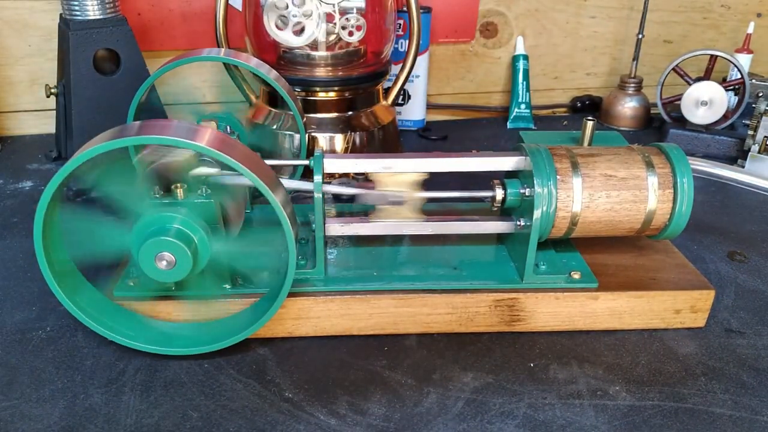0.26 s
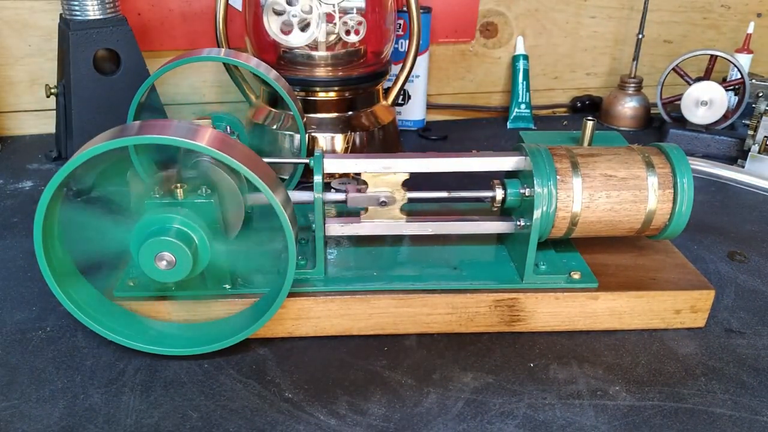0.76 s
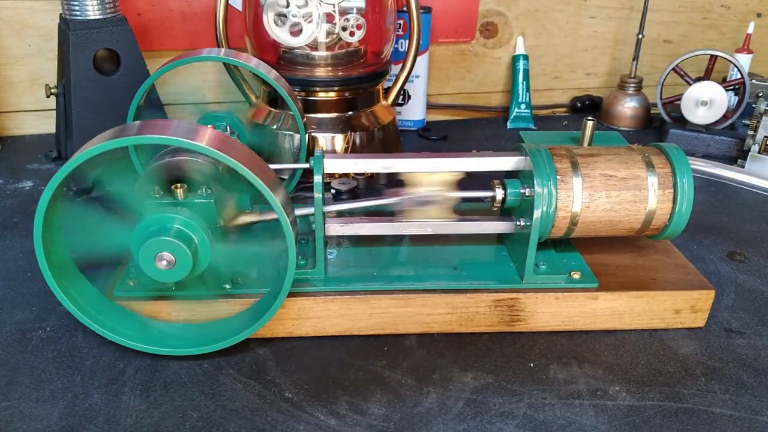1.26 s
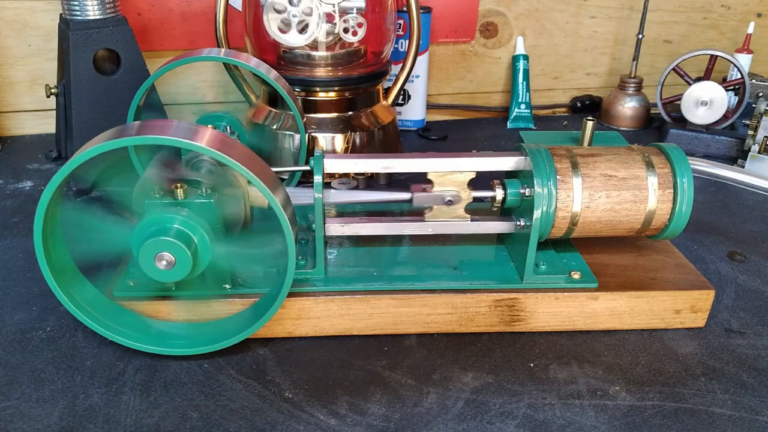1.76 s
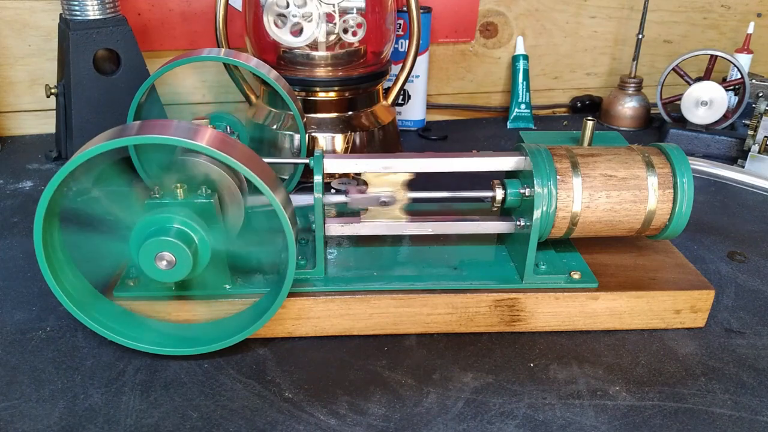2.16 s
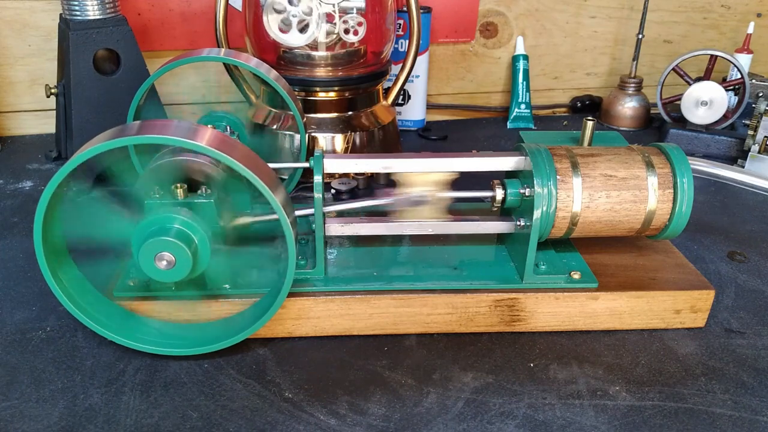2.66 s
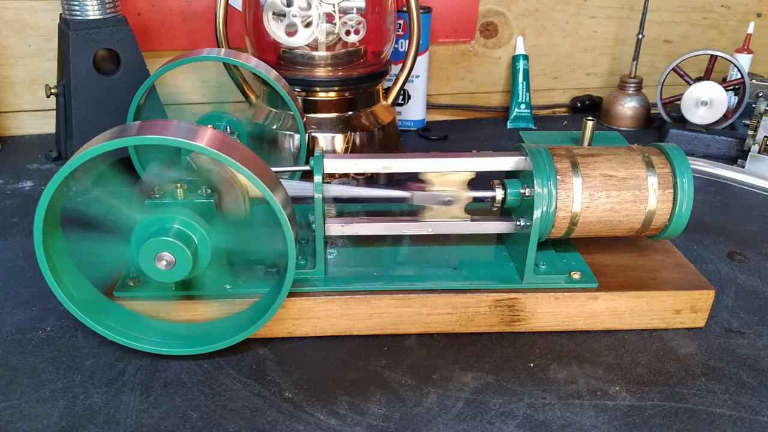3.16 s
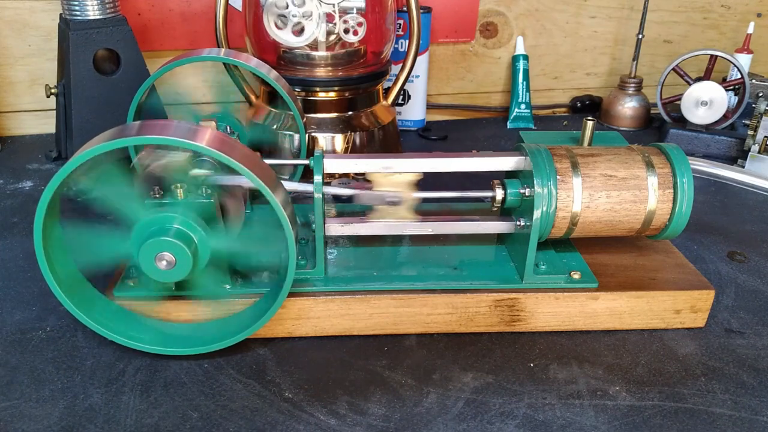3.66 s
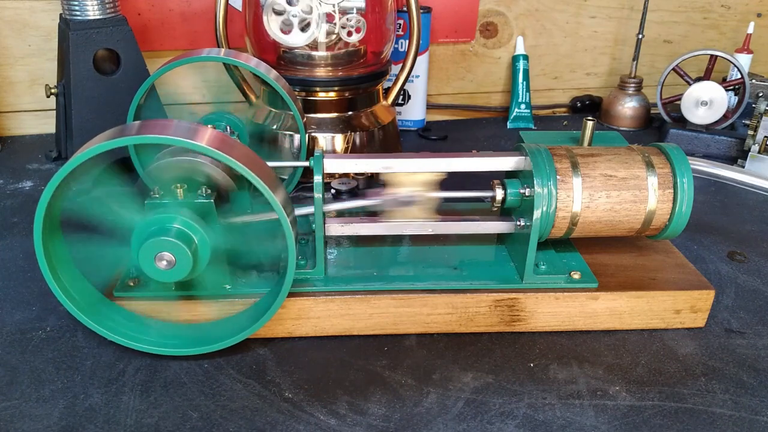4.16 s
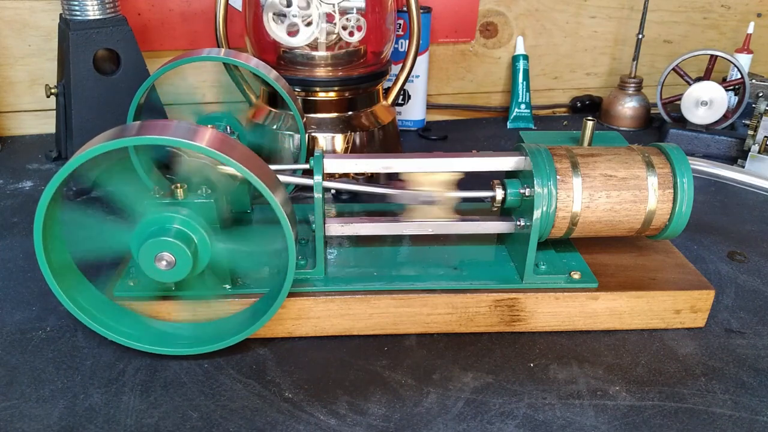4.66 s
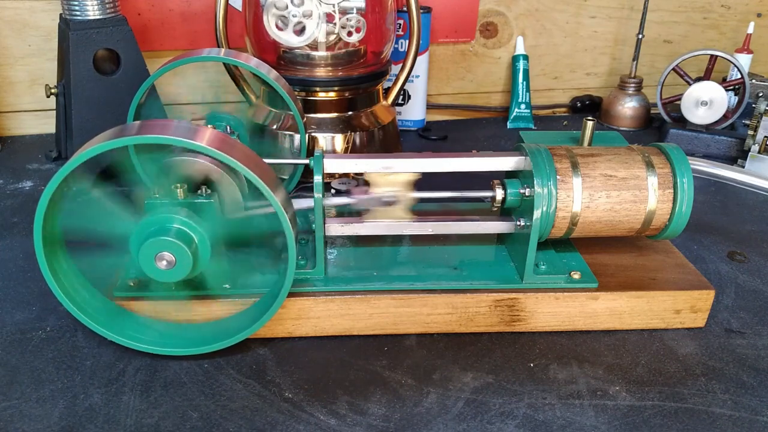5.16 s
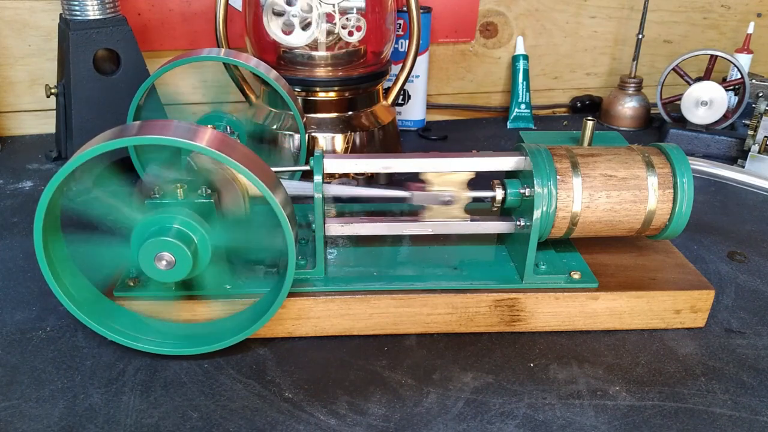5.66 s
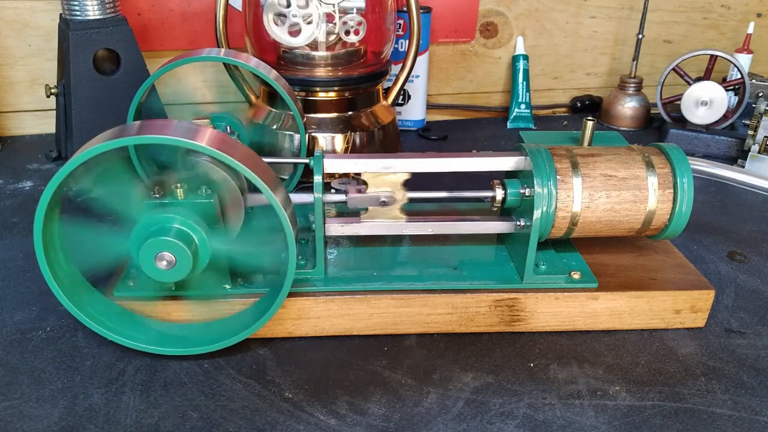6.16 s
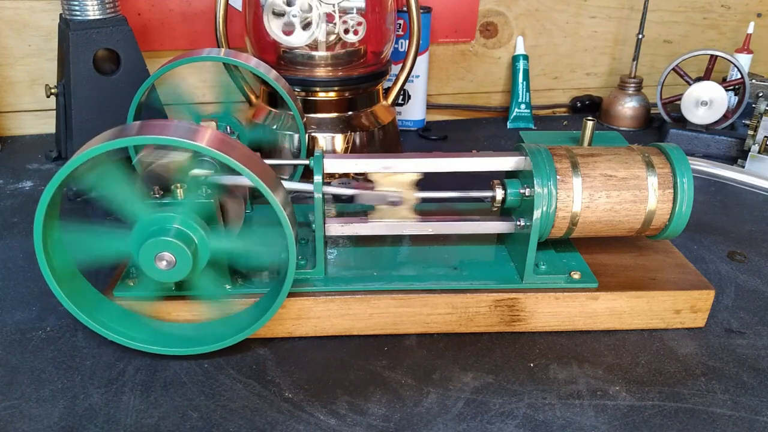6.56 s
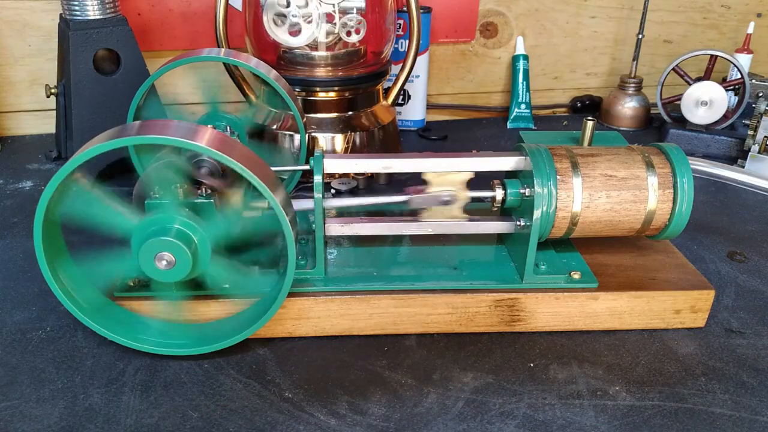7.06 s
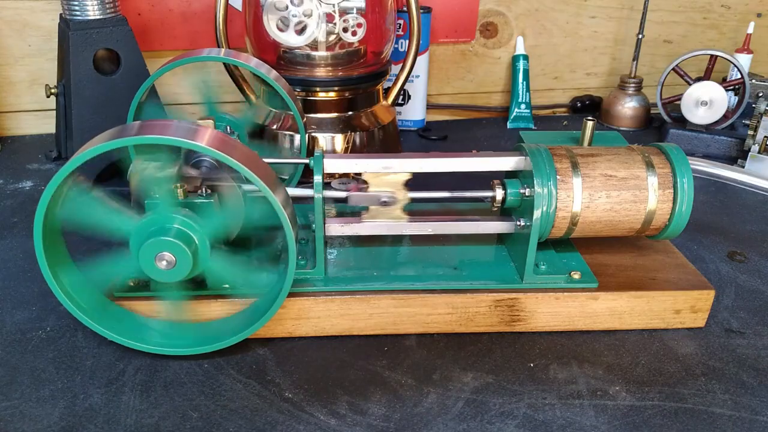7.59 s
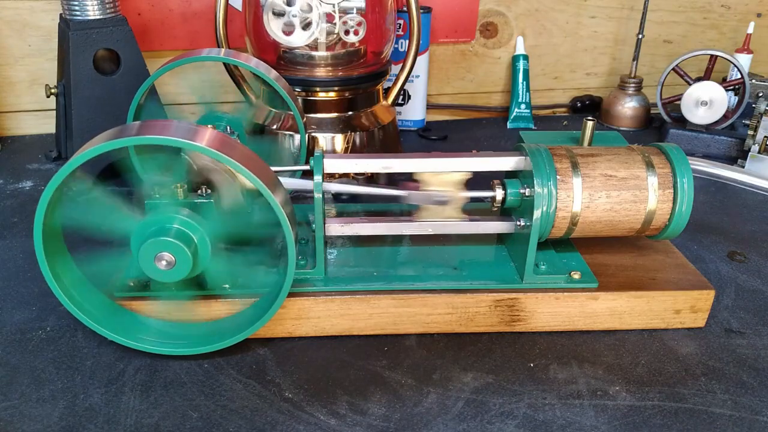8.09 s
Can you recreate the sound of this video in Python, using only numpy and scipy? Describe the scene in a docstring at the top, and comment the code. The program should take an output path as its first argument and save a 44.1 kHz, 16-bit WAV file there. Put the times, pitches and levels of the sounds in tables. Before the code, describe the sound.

A small model engine on compressed air puffs sharp, bright hisses in quick alternating strong and weak beats, gradually slowing, heard very close in a workshop.

```python
"""On a workshop bench a small double-acting model engine runs on compressed air and slowly loses speed.
Twice a turn the slide valve vents the cylinder: noise gated by the flow makes a sharp hiss, strong then weak.
Between the puffs the piston pushes the remaining air out as a softer hiss; strong puffs crest in low crackle.
Decaying sines ring the wooden base under the crank knocks, the bearing ticks, crosshead and valve rod rub.
A short echo and the quiet of the shop lie behind; the loudest puffs overload a phone held close."""
import sys
import numpy as np
from scipy import signal
from scipy.fft import rfft, irfft, next_fast_len
from scipy.io import wavfile
from scipy.ndimage import uniform_filter1d

SR = 44100
rng = np.random.default_rng(int(sys.argv[2]) if len(sys.argv) > 2 else 0)


def put_to_file(sound):
    """Save the sound as 16-bit audio at rate SR, in the file named by the first command-line argument."""
    columns = np.atleast_2d(sound).T  # one column per channel
    safe = np.clip(columns, -1, 1)
    whole_steps = np.round(safe * 32767)
    wavfile.write(sys.argv[1], SR, whole_steps.astype(np.int16))


N = 367353
T = np.arange(N) / SR  # time in s
SIZE = next_fast_len(N + SR // 2)  # transform length with room for decaying tails
HZ = np.maximum(np.arange(SIZE // 2 + 1) * SR / SIZE, 1)

# Exhaust puffs, strong and weak in turn.
# Each row: start in seconds, level of the main hiss in dB, venting time in ms.
PUFF_EVENTS = [(0.0442, -9, 18.3), (0.169, -14, 16.8), (0.3141, -9, 17.2), (0.4399, -15, 17.8),
               (0.5896, -10.5, 18), (0.7176, -14.5, 18), (0.8642, -9.5, 17.6), (0.9881, -15.5, 18),
               (1.14, -9, 18), (1.2662, -14, 19.6), (1.4146, -12, 18.6), (1.5399, -14, 16.8),
               (1.6916, -9, 18.7), (1.819, -13, 17.3), (1.9698, -11, 18.3), (2.098, -12, 17.4),
               (2.2503, -9.5, 17.7), (2.38, -16, 21), (2.5312, -9, 20), (2.661, -15, 20.4),
               (2.813, -11, 19.2), (2.9488, -14, 19), (3.1059, -9.5, 17.7), (3.2418, -14.5, 19.6),
               (3.4026, -10.5, 19.7), (3.539, -14, 19.3), (3.6996, -10, 18.7), (3.8385, -15, 18),
               (4.0034, -9, 18.8), (4.1425, -14, 18.4), (4.3107, -9.5, 16.8), (4.4572, -14.5, 20),
               (4.6293, -12, 19.7), (4.78, -12.5, 19.3), (4.9508, -8.5, 19.4), (5.104, -13.5, 19.3),
               (5.279, -11.5, 18.5), (5.4315, -14, 20.4), (5.6018, -9.5, 19.4), (5.7554, -14.5, 18.5),
               (5.9283, -10.5, 21.3), (6.0831, -15, 18.7), (6.2612, -11.5, 20.6), (6.4168, -15, 19.6),
               (6.5997, -12.5, 20.3), (6.7615, -15.5, 18.3), (6.944, -12.5, 22.2), (7.1094, -14, 19.8),
               (7.3021, -12, 19.7), (7.478, -18, 20.3), (7.6688, -13.5, 20), (7.84, -16.5, 22.2),
               (8.0327, -14.5, 24), (8.2107, -16.5, 20.6)]
# Crank knocks, one a turn shortly before the strong puff. Each row: start in seconds, level in dB.
CRANK_KNOCKS = [(0.269, -46.5), (0.55, -48.5), (0.823, -47.5), (1.091, -48.5), (1.37, -49), (1.647, -45.5),
                (1.925, -46.5), (2.203, -49.5), (2.483, -49.5), (2.767, -47), (3.056, -46.5),
                (3.351, -48.5), (3.643, -53), (3.947, -50), (4.255, -55), (4.576, -50.5), (4.897, -47.5),
                (5.222, -49.5), (5.545, -52), (5.871, -51.5), (6.209, -51), (6.543, -45.5), (6.886, -50),
                (7.246, -50), (7.613, -52.5), (7.977, -51)]


def blasts(way):
    """Jet noise: turbulence follows the flow as the valve opens and the cylinder pressure then drains."""
    # Colour of the jet at two microphone ports.
    # Each row: frequency in Hz, relative level left in dB, relative level right in dB.
    jet = [(1800, -46, -49), (2400, -27, -27), (3300, -27, -27), (5100, -25, -27), (5900, -14, -16),
           (7400, -20, -16), (8700, -3, -9), (10400, -9, -6), (11000, -20, -14), (12800, -20, -24),
           (14800, -15, -15), (15600, -15, -23)]
    # Flow while the valve port opens. Each row: share of venting time, strong puff in dB, weak puff in dB.
    # The exponents in steepness rescale this flow in each band.
    valve_opening = [(-.5, -102, -66), (-.15, -36, -52), (0, -18.5, -29), (.12, -11.5, -15), (.3, -6, -4.5),
                     (.55, 0, -2.5), (.7, 1, -0.5), (1, -2.5, -3.5)]
    # How steeply the hiss follows the flow: exponents for the low, 6 kHz, main and top bands.
    steepness = [0.74, 1.48, 1.04, 1.15]
    # Broad lift of the low, 6 kHz, main and top bands. Each row: left in dB, right in dB.
    band_lift = [(0.1, 0.13), (0.1, 1.7), (0.1, 1.16), (0.1, 0.7)]
    # Low, 6 kHz and top hiss sink with the supply pressure.
    # Each row: strong puff in dB, weak puff in dB, sag in dB per second, scatter in dB.
    flanks = [(-9.5, -14, 0.4162, 1.87), (-9.5, -13, .5, 1.14), (-9, -13, 0.31, 0.94)]
    fall_ms = 6.54  # time constant of the draining pressure
    start, main_db, vent_ms = np.transpose(PUFF_EVENTS)
    is_weak = np.arange(len(start)) % 2
    chance = rng.standard_normal((len(flanks), len(start)))
    low_db, mid_db, top_db = [np.where(is_weak, weak, strong) - sag * start + scatter * c
                              for (strong, weak, sag, scatter), c in zip(flanks, chance)]

    # the flow begins to rise before the listed start, so each puff takes over 15 ms early
    puff = np.clip(np.searchsorted(start - .015, T) - 1, 0, None)
    age_ms = (T - start[puff]) * 1000
    vented = age_ms / vent_ms[puff]
    share, strong_db, weak_db = np.transpose(valve_opening)
    strong_flow_db = np.interp(vented, share, strong_db, -120)
    weak_flow_db = np.interp(vented, share, weak_db, -120)
    opening = undb(np.where(puff % 2, weak_flow_db, strong_flow_db))
    flow = opening * np.exp(-np.maximum(age_ms - vent_ms[puff], 0) / fall_ms)

    air = pair(0.75) * flutter(500, 1.4)
    edges = 1 / (1 + (HZ / np.array([[5200.], [7600.], [11500.]])) ** 16)
    bands = np.diff(edges, axis=0, prepend=0, append=1)
    levels = [low_db, mid_db, main_db, top_db]
    hiss = 0
    for band, level, steep, lift in zip(bands, levels, steepness, band_lift):
        # eddies of each size flutter on their own
        eddies = air * flutter(150, 1.52) * flow ** steep * undb(level)[puff]
        hiss = hiss + rfft(eddies, SIZE) * band * undb(lift)[:, None]
    return through(irfft(hiss, SIZE)[:, :N], colour(jet) * way)


def pushed_air(way):
    """Flow noise of piston displacement: as the flow drops, the broad hiss dies before its narrow core."""
    # Colour of the pushed air.
    # Each row: frequency in Hz, relative level left in dB, relative level right in dB.
    pushed = [(1500, -37, -48), (2350, -51, -34), (3950, -17.5, -22), (5000, -33, -26), (5560, -6.5, -15.5),
              (7300, -13, -6.5), (8550, 10, -3.5), (10140, -7.5, -2), (11070, -10.5, -6.5),
              (15900, -22, -34)]
    # Flow over one stroke, the valve shutting at the end; broad hiss and core rescale these values.
    # Each row: share of stroke, flow after a strong puff in dB, flow after a weak puff in dB.
    stroke_flow = [(0, -15, -2), (.15, 5, 1.5), (0.398, -2, 0.5), (0.599, -4, -0.5), (.75, -4.5, -6.5),
                   (.87, -9, -15.5), (.95, -14, -15.5), (1.001, -2.5, 3)]
    strong_push_db, weak_push_db, sag_db_per_s = -34, -39, 1.05
    core_hz, core_width_hz, core_db = 8800, 580, -8
    start = np.array(PUFF_EVENTS)[:, 0]
    start = np.r_[start[0] - .15, start, start[-1] + .2]  # a stroke before the first puff and after the last
    stroke = np.interp(T, start, np.arange(len(start)))
    after_strong = stroke.astype(int) % 2
    share, strong_db, weak_db = np.transpose(stroke_flow)
    flow_db = np.where(after_strong, np.interp(stroke % 1, share, strong_db), np.interp(stroke % 1, share, weak_db))
    level_db = np.where(after_strong, strong_push_db, weak_push_db) - sag_db_per_s * T
    broad_gain = uniform_filter1d(undb(level_db + 1.43 * flow_db), size=100)
    core_gain = uniform_filter1d(undb(level_db + core_db + 0.83 * flow_db), size=100)
    broad = pair(0.44) * flutter(60, 1.2) * broad_gain
    core = pair(0.37) * flutter(49, 0.93) * core_gain
    return through(broad, colour(pushed) * way) + through(core, resonances([(core_hz, core_width_hz, 0)]))


def crackle():
    """Low crackle: a brief burst of spiky low noise with a weaker tail crests each strong puff."""
    # Each row: start in seconds, level in dB.
    crests = [(0.053, -32), (0.32, -28), (0.602, -36), (0.875, -30), (1.149, -28.5), (1.425, -34),
              (1.701, -30), (1.98, -34), (2.259, -35), (2.544, -33.5), (2.821, -33), (3.114, -32.5),
              (3.411, -37.5), (3.712, -34.5), (4.009, -38), (4.318, -32.5), (4.639, -44), (4.959, -34.5),
              (5.285, -46), (5.612, -39), (5.938, -34.5), (6.27, -42.5), (6.61, -47), (6.956, -40),
              (7.312, -46.5), (7.679, -48), (8.044, -45)]
    pan_db, pan_scatter_db = 5, 5.5  # left over right
    gain = np.zeros((2, N))
    age = np.arange(SR // 20) / SR
    shape = age / 0.0057 * np.exp(1 - age / 0.0016) + 0.18 * np.exp(-age / 0.018)
    for (start, db), chance in zip(crests, rng.standard_normal(len(crests))):
        i = int(start * SR)
        tilt_db = pan_db + pan_scatter_db * chance
        gain[:, i:i + len(age)] = shape * undb(db + np.array([[tilt_db], [-tilt_db]]) / 2)
    dull = 1j * HZ / (120 + 1j * HZ) / (1 + 1j * HZ / 2500.) ** 2
    return through(pair(0.23) * flutter(1500, 3.3) * gain, dull)


def knocks():
    """Modal ringing: bearing slack and the kick of each strong puff strike the base, with weaker rebounds."""
    # Modes of the wooden base, their levels scattered at each blow.
    # Each row: frequency in Hz, mean relative level in dB, time to decay by 60 dB in seconds.
    base_modes = [(228, -1, .08), (262, 0, .09), (330, -5, .06), (400, -2, .06), (500, -3, .05),
                  (600, -7, .04)]
    # The blow itself, then its rebounds. Each row: delay after the blow in seconds, relative level in dB.
    rebounds = [(0, 1), (.016, -13), (.029, -13)]
    kick_wait_s, kick_db, kick_sag_db_per_s, kick_scatter_db = 0.00948, -53, .5, 3
    out, age = np.zeros(N + SR), np.arange(SR // 5) / SR
    blows = [(start, db, 0) for start, db in CRANK_KNOCKS]
    for start, _, _ in PUFF_EVENTS[::2]:
        blows.append((start + kick_wait_s, kick_db - kick_sag_db_per_s * start, kick_scatter_db))
    soft_onset = 1 - np.exp(-age / 0.009)
    chances = rng.standard_normal((len(blows), len(base_modes) + 1))
    for (start, db, scatter_db), chance in zip(blows, chances):
        ring = np.zeros(len(age))
        for (hz, mode_db, t60), c in zip(base_modes, chance):
            decay = np.exp(-np.log(1000) * age / t60)
            ring += undb(mode_db + 3.6 * c) * np.sin(2 * np.pi * hz * age) * decay
        ring *= soft_onset
        for wait, step_db in rebounds:
            i = int((start + wait) * SR)
            out[i:i + len(age)] += undb(db + step_db + scatter_db * chance[-1]) * ring
    return out[:N] * undb([[1.5], [-1.5]])


def ticks():
    """Metallic impact: the bearing clicks as its slack closes, more clearly as the engine slows."""
    tick_db, rise_db_per_s, scatter_db = -79, 2.2, 2.5
    impulses = np.zeros(N)
    start = np.array(CRANK_KNOCKS)[:, 0]
    level_db = tick_db + rise_db_per_s * start + scatter_db * rng.standard_normal(len(start))
    impulses[((start + .004) * SR).astype(int)] = undb(level_db)
    decay = np.exp(-1 / (0.0048 * SR))
    gain = signal.lfilter([1], [1, -decay], impulses)
    return through(pair(0.46) * gain, resonances([(2400, 2500, 0)]))


def rub():
    """Sliding friction: crosshead scrape and valve rod rattle follow the turn and excite resonances."""
    # Sliding parts over one turn, counted from the strong puff.
    # Each row: share of turn, guide bars in dB, valve rod in dB.
    friction = [(0, -54.5, -67), (0.149, -71, -94), (.3, -75, -95), (0.422, -92, -99), (0.473, -62, -69),
                (.55, -80, -84), (.72, -87, -99), (.78, -70.5, -95), (.87, -70, -82), (.92, -110.5, -99),
                (1, -83, -74.5)]
    # Resonances of the guide bars. Each row: centre in Hz, width in Hz, relative height in dB.
    guide_modes = [(1114, 120, 11), (1322, 227, 12.5)]
    # Resonances of the valve rod. Each row: centre in Hz, width in Hz, relative height in dB.
    rod_modes = [(697, 260, 7.5), (468, 63, 6)]
    start = np.array(PUFF_EVENTS)[::2, 0]
    start = np.r_[start[0] - .27, start, start[-1] + .37]  # a turn before the first puff and after the last
    turn = np.interp(T, start, np.arange(len(start))) % 1
    share, guide_db, rod_db = np.transpose(friction)
    guide = pair(0.62) * flutter(150, 2.75) * flutter(2.88, 0.22) * undb(np.interp(turn, share, guide_db))
    rod = pair(1.0) * flutter(110, 7.0) * flutter(6.8, 0.67) * undb(np.interp(turn, share, rod_db))
    return (through(guide, resonances(guide_modes)) + through(rod, resonances(rod_modes))) * undb([[3.0], [-3.0]])


def paths():
    """Transmission: pipe, bench and wall add peaks and dips; lag and phase differ between the ports."""
    # Each row: centre in Hz, width (standard deviation) in Hz, left in dB, right in dB.
    ripple = [(5430, 110, 0, -7), (5640, 45, -6, -1), (6030, 70, 1, -6), (6330, 45, 2, 5),
              (7450, 45, 1, -6), (7840, 110, 4, 0), (8180, 70, -3, -7), (8530, 45, -7, -6),
              (8700, 70, -10, 3), (8790, 45, -4, -5), (9000, 70, -1, 8), (9390, 70, -12, -3),
              (9690, 45, -4, 2), (9860, 110, 5, 3), (10420, 45, 6, 1), (10810, 70, 2, -6),
              (11330, 70, 7, -2), (11630, 45, -4, -5), (11840, 45, -2, 8), (12830, 70, -7, -3),
              (13260, 45, -4, 6), (13650, 170, -8, -4), (14040, 45, -4, -6), (14340, 45, 1, -7),
              (15030, 70, 5, -3), (15330, 45, -6, 7)]
    # The phone body bends the phase by which the left port leads.
    # Each row: frequency in Hz, phase in radians.
    phase_bend = [(5300, 0.07), (5700, -0.97), (7200, -0.19), (10000, -0.39), (10500, -2.32), (11000, 0.74),
                  (12700, 0.041), (13500, -0.086), (14100, 1), (15000, -1.15), (15700, -1.14)]
    port_lag_ms = 0.046  # the right port hears later
    grid = np.arange(0, SR / 2, 10)
    gains_db = []
    for column in (2, 3):
        bumps = [row[column] * np.exp(-.5 * ((grid - row[0]) / row[1]) ** 2) for row in ripple]
        gains_db.append(np.interp(HZ, grid, sum(bumps)))
    late = np.exp(-2j * np.pi * HZ * port_lag_ms / 1000)
    late = late * np.exp(-1j * np.interp(HZ, *np.transpose(phase_bend)))
    return causal(np.array(gains_db)) * np.array([np.ones_like(late), late])


def room(x):
    """Reverberation: exponentially decaying noise gives a short diffuse tail, different at each port."""
    t60_s, room_db = 0.19, -10.5
    age = np.arange(SR // 2) / SR
    tail = rng.standard_normal((2, len(age))) * np.exp(-np.log(1000) * age / t60_s) * (age > .006)
    return undb(room_db) * through(x.mean(axis=0), rfft(tail, SIZE))


def shop_quiet():
    """Ambient noise: a coloured, partly shared random signal whose level wavers."""
    # Each row: frequency in Hz, relative level in dB.
    shop_colour = [(30, -11), (60, 10.5), (120, -1), (250, 6.5), (500, -4.5), (1000, -10.5), (2000, -7),
                   (5000, 0.5), (15000, -27)]
    shop_db = -70.5
    return undb(shop_db) * flutter(25, 3.0) * through(pair(0.52), undb(curve(shop_colour)))


def undb(db):
    """Logarithmic level: decibels to amplitude gain."""
    return 10 ** (np.asarray(db) / 20)


def pair(alike):
    """Coherence: noise at two ports shares a middle part and differs by a side part."""
    mid, side = rng.standard_normal((2, N))
    alike = np.clip(alike, 0, 1)
    return np.sqrt((1 + alike) / 2) * mid + np.sqrt((1 - alike) / 2) * side * np.array([[1], [-1]])


def flutter(rate, depth_db):
    """Amplitude modulation: a random gain wanders between values drawn rate times a second."""
    k = max(int(SR / rate), 1)
    held = np.repeat(rng.standard_normal(N // k + 1), k)
    return undb(depth_db * uniform_filter1d(held, k)[:N])


def curve(table, col=1):
    """Spectral envelope: levels over log frequency, falling 30 dB per octave below the first point."""
    rows = np.array(table, float)
    level_db = np.interp(np.log(HZ), np.log(rows[:, 0]), rows[:, col])
    return level_db + 30 * np.minimum(np.log2(HZ / rows[0, 0]), 0)


def causal(db):
    """Minimum phase: folding the cepstrum of this gain onto positive time gives a causal response."""
    cepstrum = irfft(db * np.log(10) / 20, SIZE)
    cepstrum[:, 1:SIZE // 2] *= 2
    cepstrum[:, SIZE // 2 + 1:] = 0
    return np.exp(rfft(cepstrum))


def colour(table):
    """Spectral colouring: causal left and right responses of a spectrum table."""
    return causal(np.array([curve(table, col=1), curve(table, col=2)]))


def resonances(modes):
    """Resonance: steep peaks of the given centre, width and height add up."""
    return sum(undb(db) / (1 + 1j * (HZ - hz / HZ * hz) / width) ** 2 for hz, width, db in modes)


def through(x, response):
    """Linear filtering: convolution with a response scaled to unit mean power."""
    power = np.mean(np.abs(response) ** 2)
    return irfft(rfft(x, SIZE) * response / np.sqrt(power), SIZE)[..., :N]


def scene():
    """Superposition: engine, its echo, pushed air, crackle and the quiet of the shop add up."""
    way = paths()
    engine = blasts(way) + knocks() + ticks() + rub()
    return engine + room(engine) + pushed_air(way) + crackle() + shop_quiet()


def record(dry):
    """Overload and band limits: peaks clip, the microphone loses the deepest bass and the top is cut."""
    full, bass_hz, top_hz = .99, 45., 15700
    clipped = np.clip(dry, -full, full)
    thin = signal.sosfilt(signal.butter(2, bass_hz, "high", fs=SR, output="sos"), clipped)
    return signal.sosfilt(signal.ellip(10, .2, 70, top_hz, fs=SR, output="sos"), thin)


dry = scene()
out = record(dry)
put_to_file(out)
```